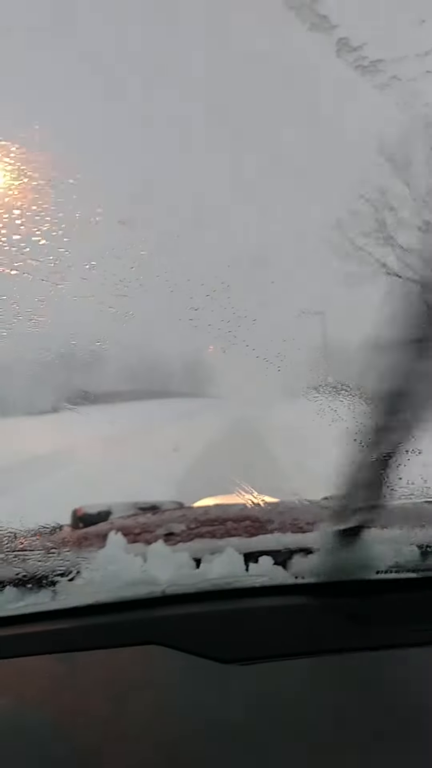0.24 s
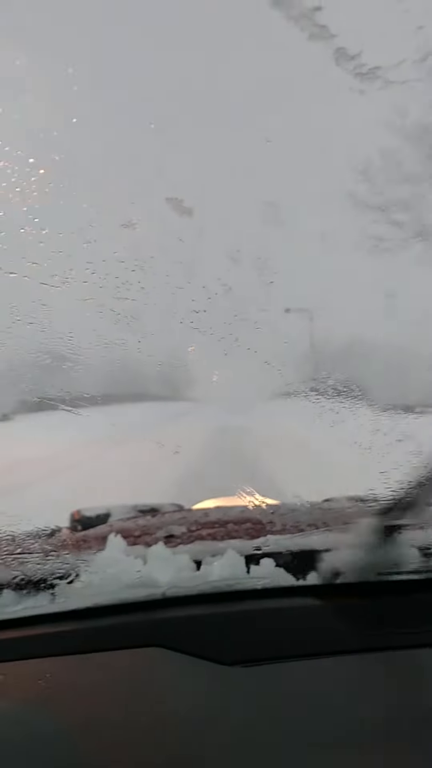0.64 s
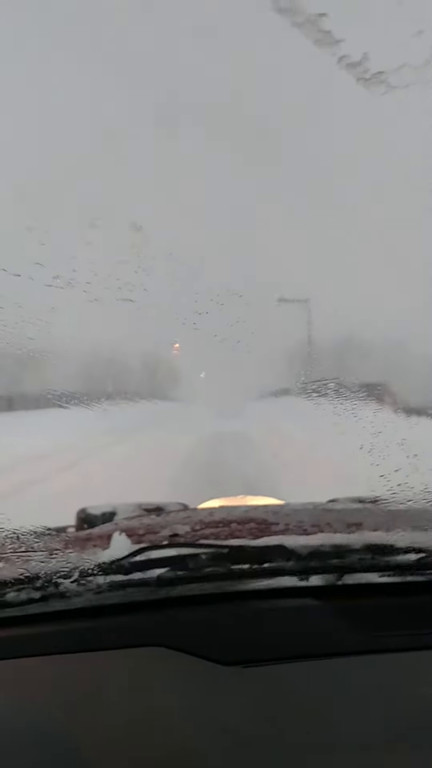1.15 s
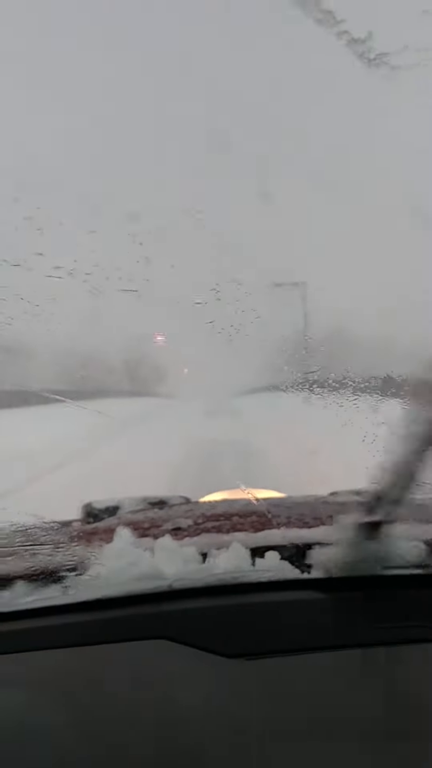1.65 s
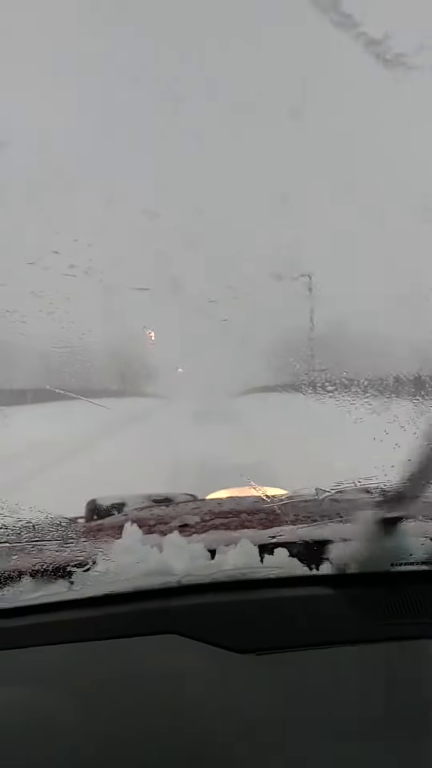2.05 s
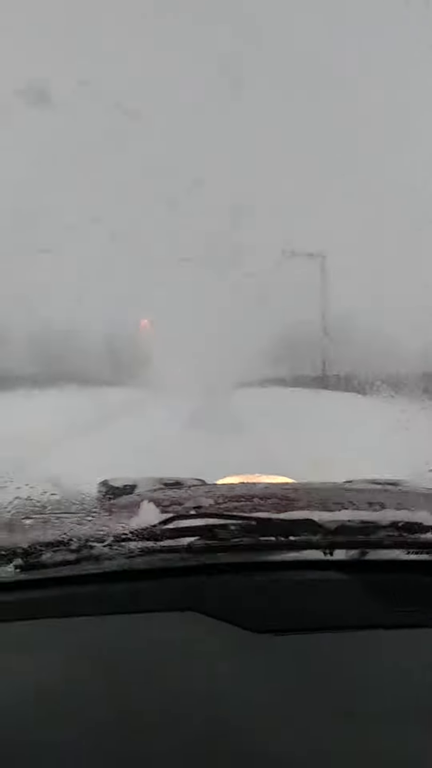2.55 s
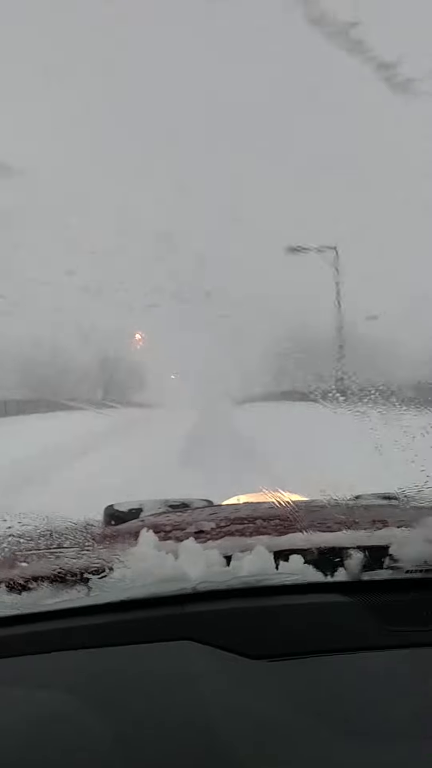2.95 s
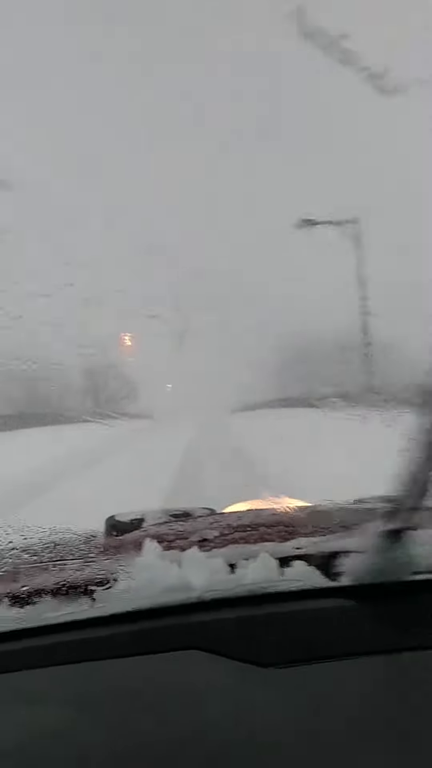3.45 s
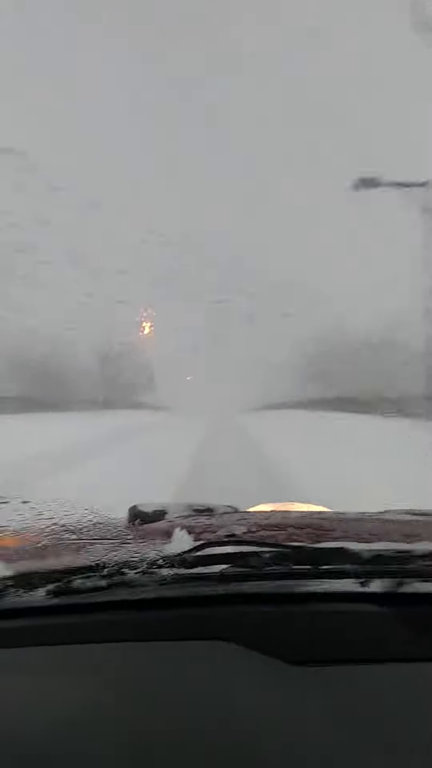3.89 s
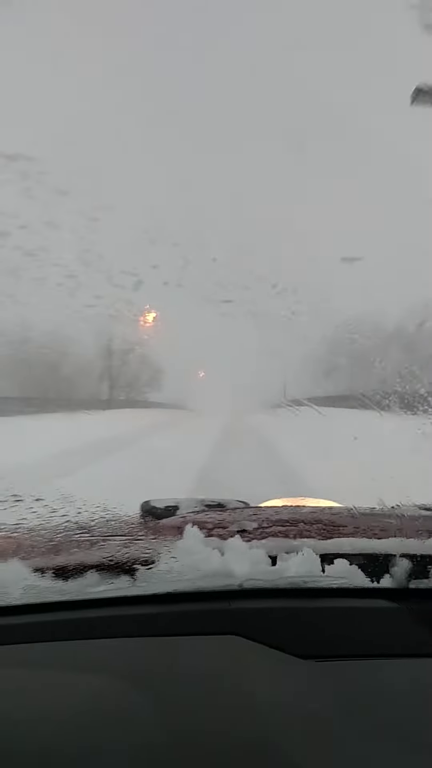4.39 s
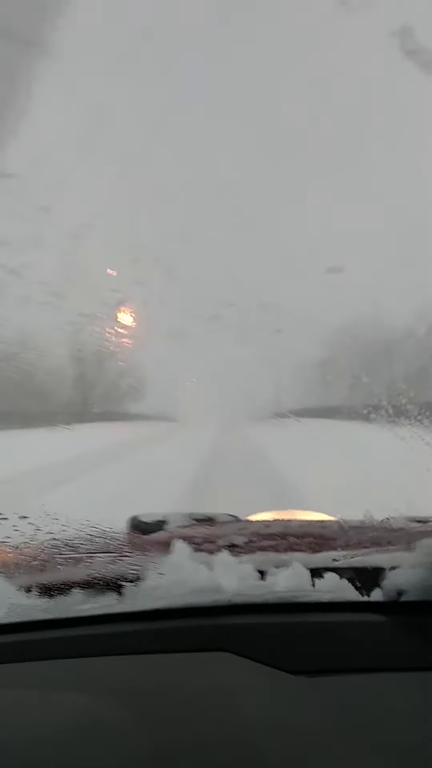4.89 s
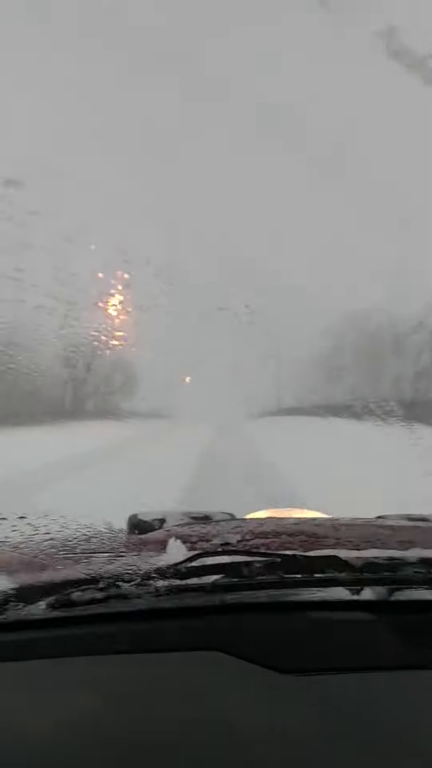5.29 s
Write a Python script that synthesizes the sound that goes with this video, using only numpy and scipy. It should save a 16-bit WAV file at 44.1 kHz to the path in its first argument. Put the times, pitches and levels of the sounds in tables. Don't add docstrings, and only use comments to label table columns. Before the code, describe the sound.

Inside a truck cab in snow, a low engine drone slowly rises over rumbling tyres while iced wipers thump rhythmically and one hard bump jolts.

```python
import sys
import numpy as np
from scipy import signal
from scipy.io import wavfile

SR = 44100
rng = np.random.default_rng(int(sys.argv[2]) if len(sys.argv) > 2 else 0)


def to_linear_factor(level_db):
    exponent = np.asarray(level_db, float) / 20
    return 10 ** exponent


def waveform_to_disk(signal):
    frames = np.transpose(np.atleast_2d(signal))
    scaled = np.clip(frames, -1, 1) * 32767
    samples = np.round(scaled).astype(np.int16)
    wavfile.write(sys.argv[1], SR, samples)


N = 243873
LEAD_S = .06


def rms_one(x):
    return x / np.sqrt(np.mean(x ** 2) + 1e-20)


def drift(rate_hz):
    pole = np.exp(-80 * np.pi * rate_hz / SR)
    white = rng.standard_normal(N // 40 + 2002)
    slow = signal.lfilter([1], [1, -2 * pole, pole * pole], white)[2000:]
    return np.interp(np.arange(N) / 40, np.arange(len(slow)), rms_one(slow))


def resonance(x, hz, width_hz):
    r = np.exp(-np.pi * width_hz / SR)
    feedback = [1, -2 * r * np.cos(2 * np.pi * hz / SR), r * r]
    return signal.lfilter([(1 - r * r) / 2, 0, (r * r - 1) / 2], feedback, x)


def soften(x, hz):
    return signal.sosfilt(signal.butter(2, hz, fs=SR, output="sos"), x)


def puff(rise_s, t60_s):
    t = np.arange(SR // 4) / SR - LEAD_S
    decay = to_linear_factor(-60 * np.maximum(t, 0) / t60_s)
    shape = np.where(t < 0, np.exp(-(t / rise_s) ** 2), decay)
    return shape * rng.standard_normal(len(t))


def add(out, s, burst):
    i = round((s - LEAD_S) * SR)
    out[i:i + len(burst)] += burst


def banded_noise(spectrum, shared_db, own_db, rate_hz):
    hz, db = np.transpose(spectrum)
    borders = np.geomspace(hz[0], hz[-1], round(3 * np.log2(hz[-1] / hz[0])) + 1)
    out, together = 0, drift(rate_hz)
    white = rng.standard_normal((2, N + SR))
    for k, (low, high) in enumerate(zip(borders, borders[1:])):
        bandpass = signal.butter(2, [low, high], "band", fs=SR, output="sos")
        band = signal.sosfilt(bandpass, white[k % 2])[SR:]
        level_db = np.interp(np.log(low * high) / 2, np.log(hz), db)
        out = out + band * to_linear_factor(level_db + shared_db * together + own_db * drift(rate_hz))
    return rms_one(out)


def engine_orders(turns, gained, t):
    # order (multiple of the cycle rate), level_db (rms)
    orders = [(1, -45), (5, -46), (6, -42), (9, -42), (11, -41), (12, -36.5), (18, -49.5), (21, -54),
              (22, -51.5), (23, -50), (26, -50), (28, -51), (31, -55), (32, -51), (33, -51.5), (38, -58.5),
              (44, -61.5), (48, -69), (50, -69), (53, -61.5)]
    gear_whine = (160, -76)
    firing_db = 4.5 * gained
    upper_db = -1.5 * np.clip((t - 5.2) / 0.18, 0, 1)
    hum, wavers = 0, [drift(4.3) for mount in range(5)]
    for order, db in orders + [gear_whine]:
        speed_db = firing_db if order < 8 else upper_db
        loudness = to_linear_factor(db + speed_db + 1.2 * wavers[order % 5])
        hum = hum + np.sqrt(2) * loudness * np.sin(2 * np.pi * (order * turns + rng.random()))
    return hum


def engine_knocks(turns):
    cylinders = [-1.5, 0.5, -0.5, -2, 0, -8.5]
    # mode_hz, width_hz, level_db
    block_modes = [(660, 190, -2.5), (1085, 43, 0), (1274, 42, 2.5), (1707, 94, -5), (2090, 49, -14),
                   (2750, 450, -17.5), (3580, 81, -10.5)]
    fired = np.floor(6 * turns).astype(int)
    at = np.flatnonzero(np.diff(fired)) + 1
    chance = rng.standard_normal((len(at), 2))
    jitter = np.round(4.4 * chance[:, 0]).astype(int)
    knocks = np.zeros(N)
    knocks[np.clip(at + jitter, 0, N - 1)] = to_linear_factor(np.array(cylinders)[fired[at] % 6] + 1.7 * chance[:, 1])
    ringing = 0
    for k, (hz, width_hz, db) in enumerate(block_modes):
        ringing = ringing + (-1) ** k * to_linear_factor(db) * resonance(knocks + 1e-18, hz, width_hz)
    return to_linear_factor(-57.0) * rms_one(ringing)


def engine():
    t = np.arange(N) / SR
    gained = .3 * np.minimum(t, 5.2)
    turns = np.cumsum(12.29 + gained) / SR
    return engine_orders(turns, gained, t) + engine_knocks(turns)


def cab(x):
    # mode_hz, width_hz, level_db
    cab_modes = [(100, 29, 1.5), (381, 68, -6.5), (415.7, 16.5, 8.5), (825, 190, -3.5), (1150, 220, 2),
                 (2110, 140, 5), (2366, 240, -6.5), (2740, 300, 4.5), (3407, 44, 6), (3530, 54, 2.5),
                 (5730, 290, 2.5), (9650, 250, -3.5)]
    for hz, width_hz, db in cab_modes:
        x = x + (to_linear_factor(db) - 1) * resonance(x, hz, width_hz)
    return x


def road_and_air():
    # band_hz, level_db (per Hz)
    rumble_spectrum = [(12, -35), (20, -1.5), (102, -10), (156, -1.5), (236, 0.5), (295, -1.5), (375, -6.5),
                       (426, -12.5), (549, -20.5), (900, -31.5), (1170, -64.5), (1980, -120)]
    # band_hz, level_db (per Hz)
    air_spectrum = [(500, -30.5), (800, -5.5), (1160, -0.5), (1430, -10), (1890, -9), (2360, -13.5),
                    (2700, -16), (3220, -16), (3870, -23), (4650, -27), (6000, -31.5), (7200, -38),
                    (9500, -41.5), (13000, -53)]
    # start_s, level_db
    roughness = [(0, 0), (.35, -1), (.8, 0.5), (1.05, -2), (1.35, 0.5), (1.7, 0), (2.2, -2), (2.5, 1.5),
                 (2.8, 0.5), (3.15, 0.5), (3.4, 0.5), (3.7, 1), (4.1, -2), (4.55, 1.8), (5.0, 0.2),
                 (5.35, 1), (5.53, -2.5)]
    road_s, road_db = np.transpose(roughness)
    rumble_db = np.interp(np.arange(N) / SR, road_s, road_db)
    buzz_db = .5 - 0.03 * drift(9.9)
    air_db = 0.38 * rumble_db
    rumble = banded_noise(rumble_spectrum, shared_db=0.7, own_db=-0.02, rate_hz=5.0)
    buzz = signal.sosfilt(signal.butter(2, 380, "high", fs=SR, output="sos"), rumble)
    rumble = rumble + (to_linear_factor(buzz_db) - 1) * buzz
    air = banded_noise(air_spectrum, shared_db=.55, own_db=.7, rate_hz=8.0)
    return cab(to_linear_factor(-27.5 + rumble_db) * rumble + to_linear_factor(-51.03 + air_db) * air)


def vents():
    # pitch_hz, width_hz, level_db (rms)
    whistles = [(1050, 41, -70.5), (1655, 87, -68), (3610, 120, -74), (4490, 270, -78.5),
                (9560, 220, -90.5)]
    out = 0
    for hz, width_hz, db in whistles:
        narrow = resonance(resonance(rng.standard_normal(N), hz, width_hz), hz, width_hz)
        out = out + to_linear_factor(db + 0.96 * drift(5.8)) * rms_one(narrow)
    return out


def wiper_reversals():
    # peak_db, mid_db, bright_db
    reversals = [
        (-23, -44, -61),
        (-25, -46, -62),
        (-23.5, -46, -60),
        (-24, -43.5, -60),
    ]
    # offset_s, level_db
    blow_times = [
        (-.0170, -16),
        (-.0077, -7),
        (0, 0),
        (.0093, -11),
        (.0160, -15),
    ]
    # mode_hz, level_db, t60_s
    glass_modes = [(160, -1, .08), (480, 6.5, .05), (540, 2, .04), (605, 1, .045), (700, -6, .035),
                   (820, -10, .03)]
    # mode_hz, width_hz, level_db
    arm_modes = [(1100, 250, 2), (1350, 250, 3), (1610, 250, 3), (2100, 400, -4), (2760, 350, -5),
                 (3300, 400, -10)]
    out = np.zeros(N)
    for stroke, (peak_db, mid_db, bright_db) in enumerate(reversals):
        s = .420 + 1.4216 * stroke
        for hz, level_db, t60_s in glass_modes:
            blows = np.zeros(SR // 4)
            for offset_s, blow_db in blow_times:
                blows[round((LEAD_S + offset_s) * SR)] = to_linear_factor(blow_db + 2.0 * rng.standard_normal())
            width_hz = np.log(1000) / np.pi / t60_s
            padded = soften(soften(blows, 680), 680)
            ring = resonance(padded, hz, width_hz) * SR / (2 * np.pi * width_hz)
            add(out, s + .001, to_linear_factor(peak_db + level_db - 7) * ring)
        scuff = puff(.01, .13)
        arm = 0
        for k, (hz, width_hz, level_db) in enumerate(arm_modes):
            arm = arm + (-1) ** k * to_linear_factor(level_db) * resonance(scuff, hz, width_hz)
        add(out, s + .002, to_linear_factor(mid_db + 14) * soften(arm, 4500))
        add(out, s - .002, to_linear_factor(bright_db + 3) * soften(resonance(scuff, 5200, 3500), 8000))
    return out


def wiper_ticks():
    # start_s, level_db, centre_hz, t60_s
    ticks = [(0.569, -58.5, 5800, .04), (1.8330, -64, 6500, .02), (1.9990, -56, 5500, 0.037),
             (2.689, -60, 6437, 0.024), (3.4312, -60, 5500, 0.027), (3.7430, -58, 5800, .05),
             (4.1900, -53, 4200, .031), (4.2235, -55, 4500, .03), (4.8500, -57, 4500, 0.031),
             (1.8230, -49, 2500, 0.029), (.5650, -50, 3500, .06), (1.766, -58, 5000, 0.06),
             (3.7476, -33, 1330, .03)]
    out = np.zeros(N)
    for s, db, hz, t60_s in ticks:
        snap = resonance(resonance(puff(.0004, t60_s), hz, .6 * hz), hz, .6 * hz)
        add(out, s, to_linear_factor(db + 4.5) * snap)
    return out


def wiper_settles():
    # start_s, level_db, rise_s
    settles = [
        (1.29, -36, .018),
        (2.605, -39, .01),
        (3.738, -40, .006),
        (2.52, -42, .012),
    ]
    out = np.zeros(N)
    for s, db, rise_s in settles:
        grains = rng.random(SR // 4) < .03
        crunch = puff(rise_s, 0.083) * grains * 3.8
        body = resonance(crunch, 1200, 700) - .3 * resonance(crunch, 2800, 1200)
        add(out, s, to_linear_factor(db + 6.5) * soften(body, 4000))
    return out


def jolt():
    t = np.arange(N) / SR - 3.7612
    push = to_linear_factor(-15) * np.exp(-(t / 0.0022) ** 2) * np.cos(2 * np.pi * 120 * t)
    heave = to_linear_factor(-23) * np.exp(-((t - .006) / 0.013) ** 2) * np.cos(2 * np.pi * 45 * (t - .007))
    return push - heave


def scene():
    wipers = wiper_reversals() + wiper_ticks() + wiper_settles()
    return (engine() + road_and_air() + vents() + wipers + jolt())[None]


def low_pass(x):
    return signal.sosfilt(signal.butter(12, 15500, fs=SR, output="sos"), x)


def record(dry):
    # start_s, step_db, break_db (break in the wave)
    gain_steps = [
        (1.5350, -2, -36),
        (1.9993, -1.5, -48),
        (2.6215, -2, -29),
        (3.5080, -1.2, -32),
        (3.7635, -3.2, -27),
        (3.7663, -2.4, -27.5),
        (4.1097, -.8, -40),
        (4.9955, -.7, -43),
        (5.1291, -1.1, -45),
        (5.3369, -1.2, -42),
    ]
    t, gain_db, breaks = np.arange(N) / SR, np.zeros(N), np.zeros(N)
    for s, step_db, break_db in gain_steps:
        recovery = np.exp(-np.maximum(t - s, 0) / .3)
        gain_db += step_db * (t >= s) * recovery
        breaks[round(s * SR)] = to_linear_factor(break_db)
    preamp_hiss = to_linear_factor(-84.5) * rng.standard_normal(N)
    loud = (dry + preamp_hiss) * to_linear_factor(soften(gain_db, 450))
    clicks = soften(signal.lfilter([1], [1, -.98], breaks + 1e-18), 3300)
    loud = loud - clicks
    x = 0.35 * np.tanh(loud / 0.35) + to_linear_factor(-75.5) * rng.standard_normal(N)
    x = x * np.minimum((t[-1] - t) / .0015 + .15, 1)
    return low_pass(x)


dry = scene()
out = record(dry)
waveform_to_disk(out)
```